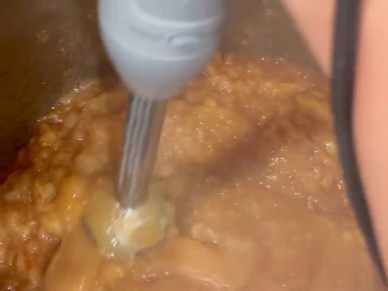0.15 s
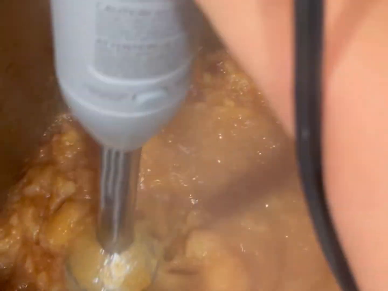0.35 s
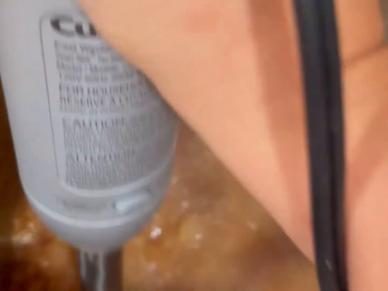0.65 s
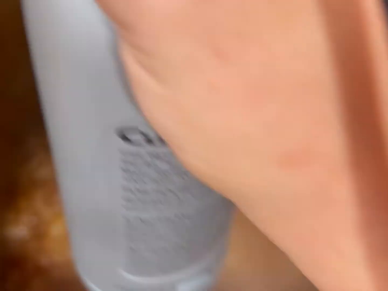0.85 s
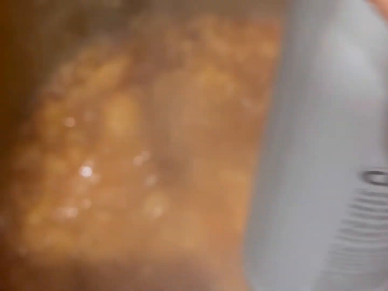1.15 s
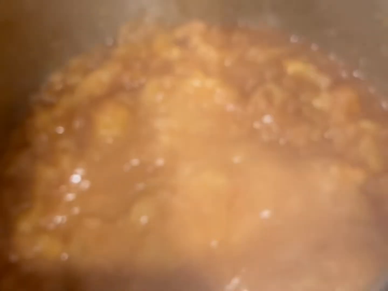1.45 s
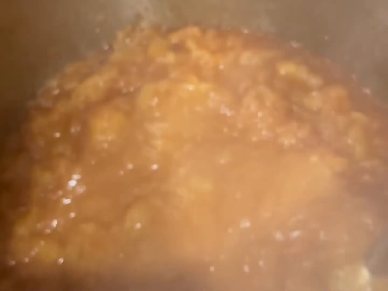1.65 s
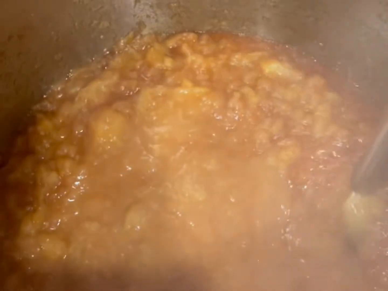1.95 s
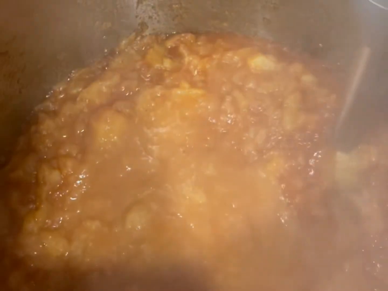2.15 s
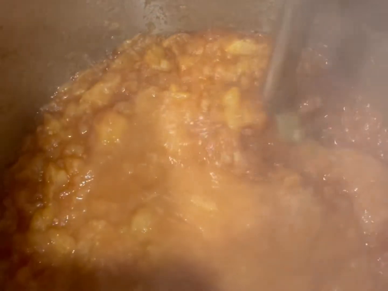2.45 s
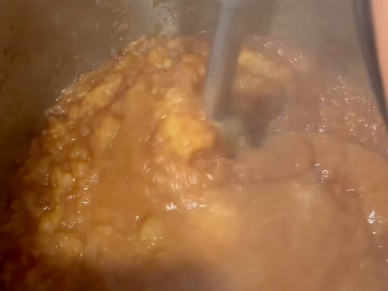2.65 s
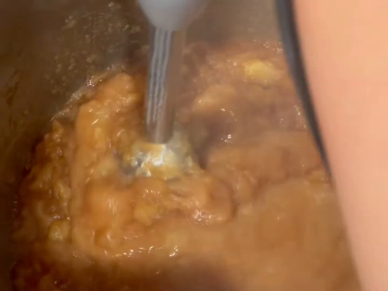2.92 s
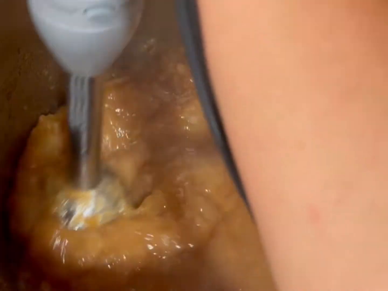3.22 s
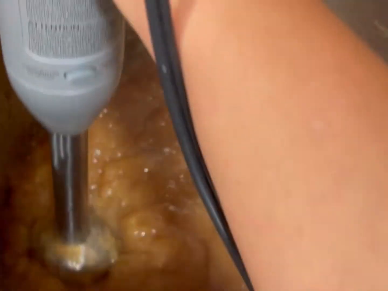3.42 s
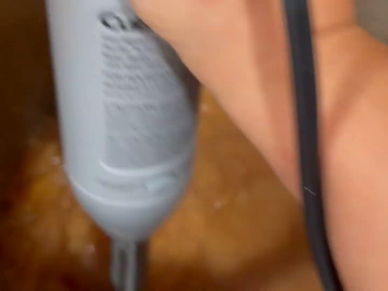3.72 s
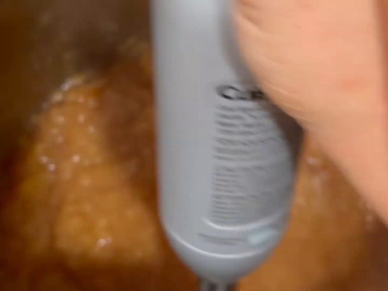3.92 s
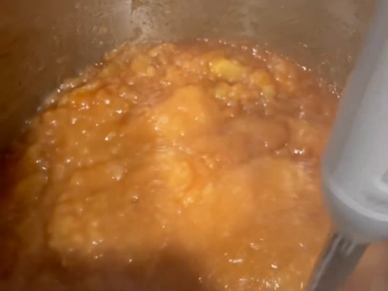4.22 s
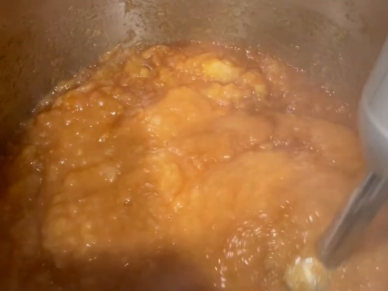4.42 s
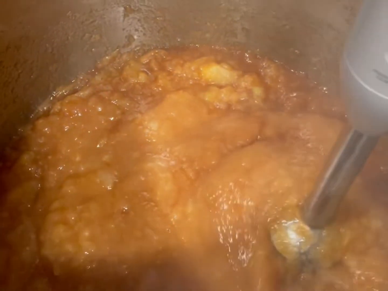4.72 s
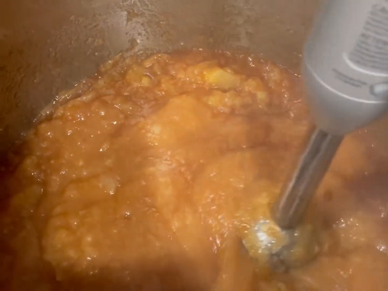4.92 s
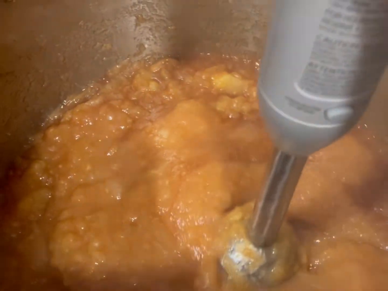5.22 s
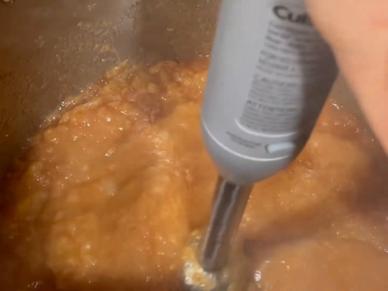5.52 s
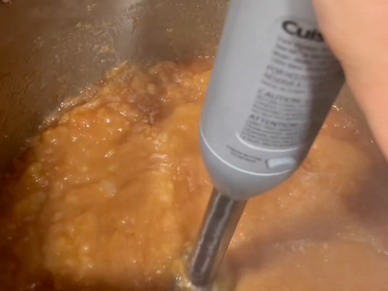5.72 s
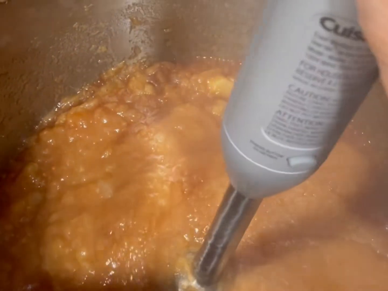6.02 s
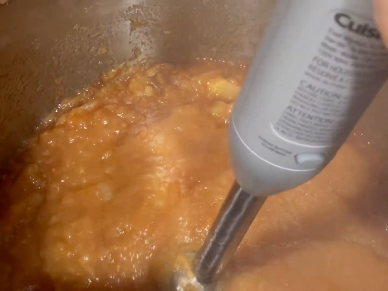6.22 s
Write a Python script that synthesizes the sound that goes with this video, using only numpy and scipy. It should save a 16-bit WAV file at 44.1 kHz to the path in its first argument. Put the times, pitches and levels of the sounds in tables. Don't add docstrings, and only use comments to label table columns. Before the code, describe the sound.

A hand blender runs close to a stereo microphone in a kitchen, its blades sunk in a pot of soft fruit. From 0 s the motor roars and whines with a low, uneven throb, hiss and a few small spits. Between about 0.7 and 1.4 s an electrical buzz swells as the motor housing passes close. At 1.2 s the guard breaks the surface with a short slurp, then sharp wet slaps around 1.35 to 1.5 s; the blades gulp and flutter. At 2.25 s the motor sags, dulls and drops in pitch, catching again at 2.45 s with a bite. It labours slightly lower around 3.2 to 3.6 s. From 4 s the pitch jumps and a dense splatter of slaps, ticking drops and splashes follows, thinning by 5.1 s. Then a steadier whir continues to the end, about 6.4 s, with occasional gulps over low room rumble.

```python
import sys
import numpy as np
from scipy import signal
from scipy.fft import rfft, irfft
from scipy.io import wavfile
from scipy.ndimage import uniform_filter1d

SR = 44100
rng = np.random.default_rng(int(sys.argv[2]) if len(sys.argv) > 2 else 0)


def inscribe(sig):
    pcm = np.round(np.clip(np.atleast_2d(sig).T, -1, 1) * 32767)
    wavfile.write(sys.argv[1], SR, pcm.astype(np.int16))


def linear_from_db(decibels):
    return 10 ** (np.asarray(decibels, float) / 20)


N = 280476
OFF_S, ON_S = 2.25, 2.44


def evened(x):
    return x / np.sqrt(np.mean(x ** 2) + 1e-20)


def read(points, hz):
    f, value = np.transpose(points)
    return np.interp(np.log(hz + 1), np.log(f + 1), value)


def curve(rows, column):
    rows = np.array(rows)
    return np.interp(np.arange(N) / SR, rows[:, 0], rows[:, column])


def swell(start, end, rise):
    t = np.arange(N) / SR
    return np.clip(np.minimum(t - start, end - t) / rise, 0, 1)


def raised(rows, rise):
    return sum(db * swell(start, end, rise) for start, end, db in rows)


def resonate(x, hz, width):
    turn = np.exp(2j * np.pi * np.cumsum(hz * np.ones(len(x))) / SR)
    r = np.exp(-np.pi * width / SR)
    return 2 * (turn * signal.lfilter([1 - r], [1, -r], x / turn)).real


def drift(size):
    coarse = rng.standard_normal(N // 50 + 2)
    for _ in range(2):
        coarse = uniform_filter1d(coarse, size // 50)
    return np.interp(np.arange(N) / 50, np.arange(len(coarse)), evened(coarse))


# pitch_hz, likeness (0 to 1)
PORT_LIKENESS = [(500, .99), (780, .6), (1000, .95), (1700, .94), (2600, .9), (3300, .6), (4300, .75),
                 (4900, .9), (5400, .85), (5950, .97), (6500, .93), (9000, .99), (11300, .93),
                 (12000, .975)]


def noise(colour, patchy_db, flicker_db):
    frames, hz = N // 128 + 5, np.fft.rfftfreq(512, 1 / SR)
    a, b, c, d, patches = rng.standard_normal((frames, len(hz), 5)).T
    patches = evened(uniform_filter1d(uniform_filter1d(patches, size=5, axis=0), size=30, axis=1))
    flicker = evened(uniform_filter1d(rng.exponential(1, frames) - 1, size=3))
    same = np.clip(read(PORT_LIKENESS, hz), 0, 1)[:, None]
    left = a + 1j * b
    right = same * left + np.sqrt(1 - same ** 2) * (c + 1j * d)
    z = np.array([left, right]) * linear_from_db(patchy_db * patches + flicker_db * flicker)
    pair = signal.istft(z, nperseg=512, noverlap=384)[1][:, :N]
    return evened(irfft(rfft(pair) * linear_from_db(read(colour, np.fft.rfftfreq(N, 1 / SR))), N))


# start_s, shaft_hz
SHAFT_SPEED = [(.4, 155.9), (.75, 152.6), (1.2, 152.8), (1.43, 163.3), (1.8, 161), (2.58, 159.7),
               (2.7, 156.9), (3.05, 157.3), (3.15, 151.8), (3.5, 149.1), (3.62, 153.8), (3.95, 154),
               (4.12, 165.5), (4.5, 163.4), (5.3, 161.3), (5.45, 158.9), (5.6, 156.2), (5.75, 159.6)]


def speed():
    t = np.arange(N) / SR
    sag = 34.34 * (1 - np.exp(-np.clip(t - OFF_S, 0, ON_S - OFF_S) / .075))
    caught = np.clip(1 - (t - ON_S) / .14, 0, 1)
    return curve(SHAFT_SPEED, column=1) - sag * caught


def driven(hz):
    return np.clip((hz - 140) / 9, .1, 1)


# start_s, throb_db, churn_db
GUARD_LEVELS = [(0, -24.5, -36), (.16, -16.5, -34.5), (1.17, -37.5, -38.5), (1.25, -18, -33.5),
                (1.5, -8.5, -26), (1.62, -20.5, -25), (2.2, -21, -25.5), (2.41, -44, -28.5),
                (2.64, -22, -28.5), (2.99, -20, -36), (3.4, -35, -38), (3.63, -26, -40.5),
                (3.9, -33, -46.5), (4.04, -15.5, -26), (5.05, -15.5, -26.5), (5.45, -20.5, -29),
                (5.85, -40, -28), (6.36, -28, -25.5)]
# pitch_hz, width_hz, level_db
POT_AIR = [
    (252.6, 23, -9),
    (285.4, 35.2, -3.5),
    (347.8, 23, -5.5),
]
# centre_s, level_db
GULPS_AND_CHOKES = [(0.085, 8), (0.208, 5.5), (0.228, -20), (0.263, -13), (0.525, 6), (1.273, 3),
                    (1.325, 5), (1.388, 8), (1.438, 0.5), (1.493, 0), (1.567, 4), (1.604, 0), (1.763, 5.5),
                    (1.805, 6), (1.83, -27), (1.874, 1), (1.985, 3), (2.009, 9.5), (2.067, -21),
                    (2.111, 6.5), (2.156, 10.5), (2.181, 2), (2.204, -26), (2.219, 13.5), (2.277, 15.5),
                    (2.629, 8.5), (2.701, 8), (2.744, -7), (2.857, 6), (3.993, 7.5), (4.025, 6.5),
                    (4.083, 4.5), (4.192, -21), (4.233, 7.5), (4.316, 7.5), (4.354, 4.5), (4.37, -24),
                    (4.422, -10), (4.452, 5), (4.508, 7.5), (4.521, -27), (4.57, 4.0), (4.604, -19),
                    (4.613, 3), (4.679, 4), (4.845, -29), (4.899, 6), (4.916, -20), (4.959, 9),
                    (5.002, -13), (5.051, 7), (5.078, 0), (5.102, 6), (5.158, -6), (5.282, 5.5),
                    (5.444, -7), (5.48, 8), (5.577, 6), (6.294, -12.5), (6.346, 11),
                    (.059, 4), (0.179, 3.5), (.245, 5), (.384, 3.5), (.492, 2), (.539, -21), (.559, 6),
                (.573, -15), (.605, 4), (.737, 2), (1.37, -10), (1.399, -5), (1.681, 6.5), (1.702, -16),
                (1.786, 2), (1.905, 5), (1.92, -14), (2.09, 4.5), (2.129, 6), (2.17, -15), (2.241, -14),
                (2.349, 12), (2.573, 5), (2.642, -13), (2.77, 6), (2.813, -3), (2.875, -10), (2.905, -9),
                (2.934, -12), (2.957, 5.5), (3.026, 7), (3.097, -11), (3.116, 3), (3.166, -13), (3.207, 7),
                (3.906, 8), (4.007, -8), (4.04, -9), (4.057, 6), (4.642, -14), (4.772, -1), (4.795, 2.5),
                (4.824, 1.5), (5.134, -7), (5.203, 4.5), (5.317, 3.5), (5.516, 3), (5.538, 2), (5.596, -17),
                (5.644, 0), (5.74, 11), (5.91, 4), (5.928, -9), (5.964, -10), (6.088, 14), (6.193, -16),
                (6.23, 1), (6.274, 4)]


def blades(turns, hz):
    churn_db = curve(GUARD_LEVELS, column=2)
    rough = .19 * linear_from_db(.6 * (churn_db + 32))
    beat = np.sqrt(2) * np.cos(2 * turns + rough * drift(size=300))
    beat *= linear_from_db(4 * rough * drift(size=200))

    stir = rng.standard_normal(N)
    smear = stir
    for width in (60, 90, 110):
        smear = resonate(smear, 2 * hz, width)
    modes = []
    for f, w, db in POT_AIR:
        mode = resonate(resonate(resonate(stir[::-1], f, w), f, 2 * w), f, 2 * w)
        modes.append(linear_from_db(db) * evened(mode))
    air = evened(sum(modes))

    throb = evened(driven(hz) * (beat + linear_from_db(-17 + 0.21 * (churn_db + 41.5)) * evened(smear)))
    throb += linear_from_db(-13 - 0.4 * (hz - 161.0)) * modes[1]

    coarse = np.arange(0, N, 40) / SR
    gulps_db = np.zeros(len(coarse))
    for s, db in GULPS_AND_CHOKES:
        length_s = 0.017 if db > 0 else 0.0054
        gulps_db += db * np.exp(-((coarse - s) / length_s) ** 2)
    gulps_db = np.interp(np.arange(N) / SR, coarse, gulps_db)
    throb_db = curve(GUARD_LEVELS, column=1) - 5.5 + gulps_db
    return linear_from_db(throb_db) * throb + linear_from_db(churn_db - 1.0) * air


# start_s, end_s, buzz_db over rest
WINDING_PASSES = [
    (.15, 0.98, -1),
    (.7, 0.94, 14),
    (.86, 1.41, 15.5),
    (3.45, 4.6, 4),
    (5.6, 7, 7),
]


def closeness():
    return raised(WINDING_PASSES, 0.07)


# start_s, end_s, level_db over rest
BEARING_LEANS = [(.05, 1.45, 9), (1.35, 1.8, 12), (1.75, 2.45, 13.5), (3.65, 4.25, 9), (4.2, 5.55, 8),
                 (5.9, 6.6, 8.5)]
# start_s, end_s, level_db over rest
OVERTONE_SINGS = [(-.2, .7, 14.5), (.55, 1.1, 7.5), (1.7, 2.3, 14.5), (2.5, 3.18, 15), (3.35, 4.02, 10),
                  (4.3, 5.55, 18.5), (5.5, 6.6, 13)]


def hum(turns, hz):
    mains = 2 * np.pi * 120.4 * np.arange(N) / SR
    lean_db = -52.5 + raised(BEARING_LEANS, 0.15) + 1.9 * drift(size=1200)
    bearing = linear_from_db(lean_db) * driven(hz) * np.cos(turns + 0.34 * drift(size=800))
    sing_db = -55 + raised(OVERTONE_SINGS, .1) + 2 * drift(size=1200)
    overtone = linear_from_db(sing_db) * np.cos(4 * turns + .3 * drift(size=600))
    buzz = np.cos(mains + 0.5 * drift(size=900)) + linear_from_db(-23) * np.cos(mains / 2)
    buzz += linear_from_db(-9 + 3 * drift(size=2500)) * np.cos(2 * mains - turns)
    buzz *= linear_from_db(-55 + closeness() + 2.14 * drift(size=2000))
    return np.sqrt(2) * (bearing + overtone + buzz)


# start_s, nearness_db, cavity_hz (hand to pot wall), vents_db
HOUSING_PATH = [(0, -27.5, 1460, -47), (.42, -28.5, 1560, -34.5), (.66, -25.5, 1914, -43),
                (.96, -28.5, 2650, -39), (1.14, -31, 1850, -39.5), (1.42, -26, 1710, -36),
                (1.6, -31.5, 1550, -32), (2.25, -35, 1670, -46), (2.58, -33, 1440, -40),
                (3.1, -30, 1510, -49), (3.35, -30.5, 2133, -63), (3.65, -27.5, 2130, -67),
                (4.1, -28, 1760, -32), (4.3, -35, 1840, -32), (4.48, -38.5, 1630, -33),
                (4.85, -35, 1635, -38), (5.4, -35, 1550, -36.5), (6.36, -33.5, 1440, -41)]
# shaft_multiple, level_db, side_db (lines one turn away), wobble_rad (at mains ripple)
COMMUTATOR_LINES = [(48, -1, -11, .8), (36, -11, -10, .7), (24, -17, -9, .4), (60, -15, -4, 1.2),
                    (72, -22, -6, 1.2)]


def whine(turns, hz):
    mains = 2 * np.pi * 120.4 * np.arange(N) / SR
    load = np.clip((167 - hz) / 6, .7, 1.8)
    out = np.zeros(N)
    for order, db, side_db, ripple in COMMUTATOR_LINES:
        sides = 1 + 2 * linear_from_db(side_db + 4 * drift(size=4000)) * np.cos(turns)
        wobble = ripple * load * np.sin(mains) + .6 * np.cos(turns)
        line = np.cos(order * turns + wobble + .3 * drift(size=500))
        out += linear_from_db(db + 2 * drift(size=3000)) * sides * line
    return np.sqrt(2) * linear_from_db(curve(HOUSING_PATH, column=3)) * driven(hz) * out


# shaft_multiple, start_s, end_s, level_db
POSE_FLARES = [(7.8, 0, .25, -44), (8.3, .44, .56, -42), (10.6, .2, .38, -42), (7.9, .6, .74, -44),
               (10, .05, .4, -44), (16, 0, .3, -46), (16, 2.62, 2.95, -47), (19, .87, 1.03, -43),
               (7.65, 2.62, 3.2, -43), (5, 2.98, 3.14, -39), (10.5, 2.86, 3.02, -44),
               (10.9, 3.16, 3.27, -43), (9.6, 3.76, 3.95, -44), (13, 3.33, 3.63, -37), (24, 4.3, 4.8, -54),
               (24, 5.5, 6.36, -54), (12, 5.6, 6.36, -46)]


def flares(turns):
    out = np.zeros(N)
    for order, start, end, db in POSE_FLARES:
        level = linear_from_db(db + 4 * drift(size=600)) * swell(start, end, .05)
        out += level * np.cos(order * turns + .9 * drift(size=250))
    return np.sqrt(2) * out


def rattle(turns):
    knocks = np.zeros(N)
    for k in range(5, 21):
        knocks += linear_from_db(4 * drift(size=5000)) * np.cos(k * turns + .3 * drift(size=600))
    return evened(knocks)


# pitch_hz, level_db
ROAR_COLOUR = [(600, -9.5), (950, 2.5), (1100, -1), (1230, 3), (1340, -0.5), (1450, 0.5), (1900, 0),
               (2100, -1), (2500, 3), (2900, -5.5), (3800, -3), (4900, -5.5), (5600, -5), (7000, -29)]
# pitch_hz, width_hz, level_db over the roar
HOUSING_PANELS = [
    (1225, 35, -13),
    (1421, 25, -15),
    (1960, 40, -17),
    (3103, 18, -22),
]


def roar(turns, hz):
    near_db = curve(HOUSING_PATH, column=1)
    out = noise(ROAR_COLOUR, patchy_db=1.42, flicker_db=0.86) + linear_from_db(-8) * driven(hz) * rattle(turns)
    cavity = evened(resonate(out[0], curve(HOUSING_PATH, column=2), 980))
    out += linear_from_db(-.7 * (near_db + 29.5)) * cavity
    out += sum(linear_from_db(db) * evened(resonate(out[1], f, w)) for f, w, db in HOUSING_PANELS)
    out *= 1 + 0.0081 * np.cos(turns) + 0.11 * np.cos(2 * turns)
    treble = signal.filtfilt(*signal.butter(2, 2700, "highpass", fs=SR), out)
    out -= .6 * (1 - driven(hz)) * treble
    return linear_from_db(near_db - 5.5) * out


# pitch_hz, level_db
HISS_COLOUR = [(3500, -25), (5000, -10), (5900, -6), (6400, -7), (7400, -3.5), (8300, -4), (9100, -.5),
               (9800, -.5), (11100, -4.5), (11800, -12), (12500, -22), (13300, -34), (15600, -38),
               (16000, -70)]
# shaft_multiple, width_hz, level_db over the hiss
BRUSH_SPARKS = [(48, 450, -13), (61, 600, -10), (73, 600, -18)]
# start_s, end_s, level_db of the thinnest hiss
FACING_VENTS = [(-.3, .3, 3.5), (.6, 1.2, 1), (2.48, 2.78, 4.72), (2.7, 3.25, 0.69), (3.65, 4.3, 2)]


def hiss(turns, hz):
    out = noise(HISS_COLOUR, patchy_db=2.0, flicker_db=1.0)
    broad = signal.filtfilt(*signal.butter(3, 9000, fs=SR), out)
    out -= .6 * (1 - driven(hz)) * broad
    sparks = np.zeros(N)
    for k, w, db in BRUSH_SPARKS:
        crackle = resonate(resonate(out[0, ::-1], k * hz, w), k * hz, w)
        sparks += linear_from_db(db + 1.7 * drift(size=6000)) * evened(crackle)
    out += driven(hz) * sparks
    thin = signal.filtfilt(*signal.butter(3, 9300, "highpass", fs=SR), out)
    out += (linear_from_db(raised(FACING_VENTS, 0.16)) - 1) * thin
    out *= 1 + 0.0051 * np.cos(turns) + 0.045 * np.cos(2 * turns)
    return linear_from_db(-32.5 + 0.35 * (curve(HOUSING_PATH, column=1) + 29)) * out


# pitch_hz, level_db
CHURN_COLOUR = [(120, -16.5), (200, -24), (400, 0), (460, 6.5), (530, 1.5), (580, -5), (800, -1.5),
                (1000, -7), (1500, -33.5)]


def churn(hz):
    churn_db = curve(GUARD_LEVELS, column=2)
    tumble = linear_from_db(churn_db - 1.5) * noise(CHURN_COLOUR, patchy_db=2.0, flicker_db=0.6)
    slosh = evened(resonate(resonate(rng.standard_normal(N), 121, 54), 163, 83))
    bite = resonate(resonate(rng.standard_normal(N), 4 * hz, 260), 4 * hz, 400)
    bite *= swell(ON_S + 0.12, ON_S + 0.214, 0.034)
    bite /= np.std(bite[round(ON_S * SR):][:9000])
    return tumble + linear_from_db(churn_db - 21) * slosh + linear_from_db(-32) * bite


# start_s, peak_db, ring_hz, spit_db over the ring
FRUIT_SLAPS = [(0.492, -17, 1270, -23), (1.222, -33, 2300, -15), (1.233, -29, 1430, -17),
               (1.2482, -15, 2400, -23), (1.3528, -2.5, 2170, -13.5), (1.3589, -12.5, 1560, -5),
               (1.3682, -8.5, 1170, -16), (1.383, -18, 2280, 0), (1.3892, -13.5, 1460, -7),
               (1.4664, -13, 1390, -7), (2.69, -18.5, 1190, -13), (3.9824, -10, 2350, -32),
               (3.9873, -5.5, 1370, -39), (4.0197, -5, 1322, -39), (4.0504, -8, 1760, -31),
               (4.0534, -3.5, 1358, -31), (4.0762, -6.5, 2500, -33), (4.084, -15, 1280, -25),
               (4.1293, -8, 1430, -30), (4.2053, -13, 1260, -27), (4.2251, -7, 2900, -27),
               (4.2427, -10, 1480, -15), (4.2672, -14, 1520, -12), (4.2824, -8.5, 1600, -9),
               (4.3122, -19, 1290, -0.5), (4.5441, -10, 1240, -17.5), (4.5578, -13.5, 1780, -25),
               (4.58, -16, 1477, -18), (4.7763, -23, 1290, 0.5), (4.8949, -15, 1450, -17),
               (1.418, -24, 2558, -20), (1.4498, -25, 1420, -20), (1.535, -20, 2390, -16),
               (1.5545, -41, 1780, -20), (3.9433, -14.5, 2720, -30), (4.0235, -31, 2300, -30),
               (4.094, -31, 2697, -25), (4.112, -32, 2600, -25), (4.1698, -14.5, 1560, -27),
               (4.3968, -27, 1470, -15), (4.566, -13.5, 1797, -20), (4.592, -21, 1530, -22),
               (4.7345, -24, 1010, -15), (4.8134, -19, 1850, -15), (.59, -15, 2078, -25),
               (4.3468, -29, 1570, -16), (4.5174, -17, 1050, -26), (4.7633, -24.5, 1180, -17),
               (5.0272, -21, 1801, -20)]
# start_s, peak_db, pitch_hz, crack_db over the peak
WALL_DROPS = [(1.403, -9, 7660, -35), (2.0676, -21, 5830, -30), (2.175, -25, 5750, -25),
              (2.2156, -17, 7800, -27), (2.6139, -12.5, 9800, -19), (2.9564, -17.5, 10500, -10),
              (3.0479, -13, 10200, -8), (4.053, -9, 10100, -22), (4.348, -9.5, 7670, -21),
              (4.437, -16.5, 8100, -18), (4.517, -14.5, 8100, -38), (4.5677, -13, 8100, -29),
              (4.6008, -17, 5760, -27), (4.612, -18, 7990, -19), (4.69, -14.5, 8060, -23),
              (4.764, -17, 7840, -21), (4.7764, -9.5, 6670, -11), (4.816, -15, 6076, -32),
              (4.8304, -13.5, 6820, -27), (4.8514, -18, 7800, -26), (4.8918, -14, 7900, -13),
              (5.0275, -16, 5500, -21), (5.0726, -15.5, 7770, -29), (5.1287, -17.5, 7856, -17),
              (.0448, -19, 11100, -32), (.3047, -29, 7200, -25), (0.4564, -22, 10950, -25),
              (2.692, -24, 6000, -12), (2.94, -27, 10070, -14), (3.8297, -32, 7220, -25),
              (4.0889, -26, 7880, -25), (4.535, -22, 6500, -32), (4.556, -25, 6000, -30),
              (4.584, -24, 5900, -30), (4.642, -30, 6300, -28), (4.955, -31, 6000, -21),
              (5.038, -28, 5600, -30), (5.107, -21, 5800, -30), (1.224, -20, 4000, -40),
              (1.251, -19, 4000, -40), (1.533, -19, 6500, -30), (1.467, -16, 5700, -23),
              (4.3118, -15, 6200, -25), (4.241, -14, 6500, -30)]


def slaps():
    out, t = np.zeros((2, N + 2000)), np.arange(2000) / SR
    bright = signal.butter(3, [3500, 11700], "bandpass", fs=SR)
    crisp = signal.butter(2, [5500, 14000], "bandpass", fs=SR)
    hits = []
    for k, (s, db, hz, spit_db) in enumerate(FRUIT_SLAPS):
        hits.append((s, db, hz, db + spit_db + 9.0, (5600, 7800)[k % 2], 0))
    for s, db, hz, crack_db in WALL_DROPS:
        hits.append((s, db - 10, 2300, db + 0.5, hz, linear_from_db(crack_db + 7.5)))
    bursts = rng.standard_normal((len(hits), 2, 2000))
    for (s, db, hz, spit_db, spit_hz, snap), (puff, spit) in zip(hits, bursts):
        fall = np.exp(-t * hz / 5.7) * np.minimum(t / 0.00017, 1)
        slide = np.exp(-t / 0.039) * (1 - t / t[-1])
        wet = puff * (fall + 0.42 * slide)
        body = resonate(wet, hz, 540) + 0.74 * resonate(wet, 2.0 * hz, 800)
        body = resonate(resonate(body, 0.73 * hz, 2500), 1.3 * hz, 3000)
        top = resonate(resonate(spit * fall ** 0.5, spit_hz, 1600), spit_hz, 3800)
        top += 1.03 * signal.lfilter(*bright, spit * fall ** 1.5)
        top = signal.lfilter(*bright, top)
        crack = signal.lfilter(*crisp, [spit, 0.6 * spit + 0.8 * puff]) * np.exp(-t / .0013)
        top = top / abs(top).max() + snap * crack
        hit = linear_from_db(db - 2.0) * body / abs(body).max() + linear_from_db(spit_db) * top / abs(top).max()
        out[:, round(s * SR):][:, :2000] += hit
    return out[:, :N]


# start_s, level_db
AIR_SLURPS = [
    (1.22, -30),
    (3.972, -44),
]


def slurps():
    out, t = np.zeros(N), np.arange(6000) / SR
    hz = 850 + (3600 - 850) * np.exp(-t / .012)
    for (s, db), air in zip(AIR_SLURPS, rng.standard_normal((len(AIR_SLURPS), 6000))):
        shape = np.minimum(t / 0.0027, 1) * np.clip(1 - t / .16, 0, 1)
        shape *= linear_from_db(2 * evened(uniform_filter1d(air[::-1], size=250)))
        pocket = evened(resonate(resonate(air, hz, 260), hz, 500))
        out[round(s * SR):][:6000] += linear_from_db(db) * shape * pocket
    return out


# start_s, end_s, level_db
PULP_SPLASHES = [(1.215, 1.295, -36), (1.348, 1.499, -40), (3.975, 4.14, -43), (4.201, 4.326, -30.5),
                 (4.531, 4.623, -35), (4.875, 4.91, -39), (0.866, 1.048, -38)]
# pitch_hz, level_db
SPLASH_COLOUR = [(600, -20), (1200, -4), (2000, -0.5), (3000, 2), (4200, -6), (6000, -17), (8000, -14),
                 (11000, -40)]


def splashes():
    level = sum(linear_from_db(db) * swell(start, end, 0.006) for start, end, db in PULP_SPLASHES)
    return level * linear_from_db(4.9 * drift(size=150)) * noise(SPLASH_COLOUR, patchy_db=1, flicker_db=3.0)


# pitch_hz, level_db
KITCHEN_COLOUR = [(20, -34), (33, -24), (40, -10), (50, 13), (62, 8), (100, -5), (180, -9), (300, -29)]


def rumble():
    return linear_from_db(-50.5 + 0.15 * (closeness() - 18)) * noise(KITCHEN_COLOUR, patchy_db=1.5, flicker_db=0)


def scene():
    hz = speed() * (1 + 0.001396 * drift(size=1500))
    turns = 2 * np.pi * np.cumsum(hz) / SR
    motor = hum(turns, hz) + whine(turns, hz) + flares(turns) + roar(turns, hz) + hiss(turns, hz)
    fruit = churn(hz) + slaps() + slurps() + splashes()
    return blades(turns, hz) + motor + fruit + rumble()


def thinned(pair):
    sums = np.array([pair[0] + pair[1], pair[0] - pair[1]]) / 2
    hz, _, z = signal.stft(sums, SR, nperseg=2048)
    band = np.arange(len(hz)) // 16
    power = np.add.reduceat(abs(z) ** 2, np.arange(0, len(hz), 16), axis=1)[:, band]
    masked = (power < linear_from_db(-25) * power[::-1]) & (hz > 1300)[:, None]
    faint = (power < linear_from_db(2 * -62.)) & (hz > 11800)[:, None]
    top = power[:, hz > 12500].sum(axis=(0, 1))
    sharp = top > linear_from_db(15) * np.median(top)
    kept = ~((masked | faint) & ~sharp)
    mid, side = signal.istft(z * kept, SR, nperseg=2048)[1][:, :N]
    return np.array([mid + side, mid - side])


def band_limit(x):
    return signal.sosfilt(signal.butter(12, 15800, fs=SR, output="sos"), x)


# pitch_hz, lag_rad
PORT_LAG = [(50, 0), (550, -.4), (1400, 0), (2000, .05), (2800, .7), (4200, 1.3), (4900, 3.14), (5850, 6.2),
            (6150, 6.4), (8850, 9.25), (9250, 9.55), (11900, 12.5), (13300, 12.8), (15500, 15.4)]
# pitch_hz, level_db right over left
PORT_TILT = [(400, 0), (750, 4), (1200, 2), (1800, 3.5), (2800, 3.5), (3400, 0), (16000, 2)]


def record(dry):
    hz = np.fft.rfftfreq(N, 1 / SR)
    port = linear_from_db(read(PORT_TILT, hz) / 2)
    lag = np.exp(-1j * np.interp(hz, *np.transpose(PORT_LAG)))
    heard = irfft(rfft(dry) * np.array([1 / port, port * lag]), N)
    mix = thinned(np.tanh(heard / 1.6) * 1.6)
    return band_limit(mix)


dry = scene()
out = record(dry)
inscribe(out)
```